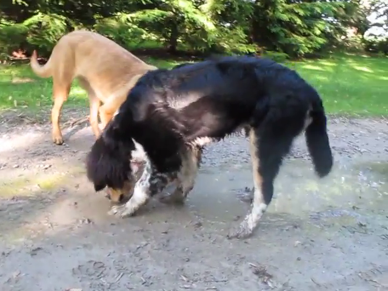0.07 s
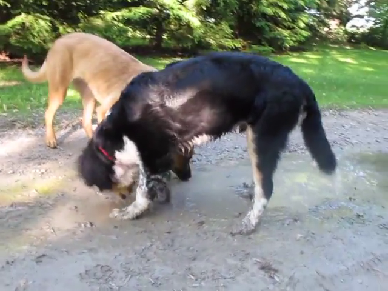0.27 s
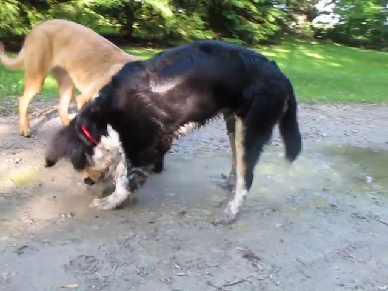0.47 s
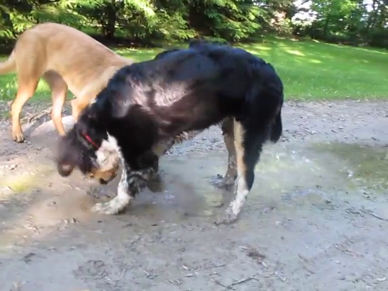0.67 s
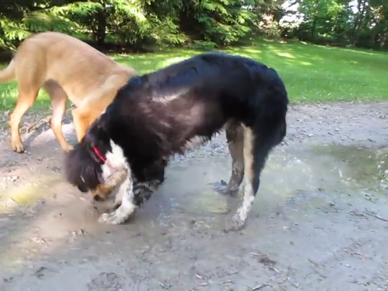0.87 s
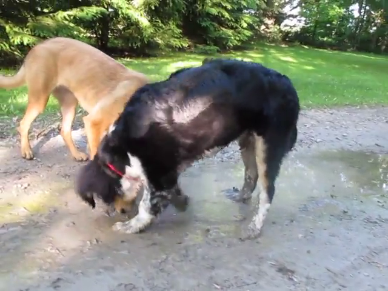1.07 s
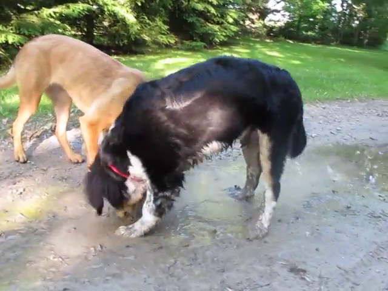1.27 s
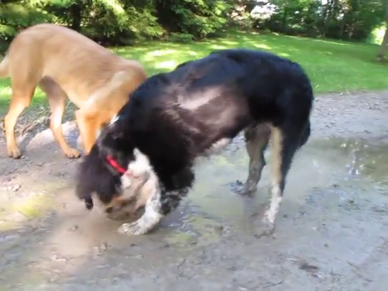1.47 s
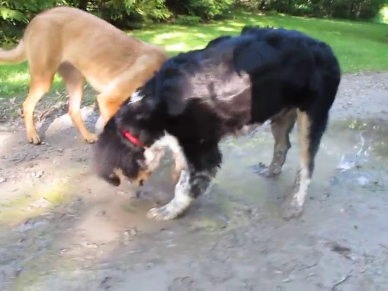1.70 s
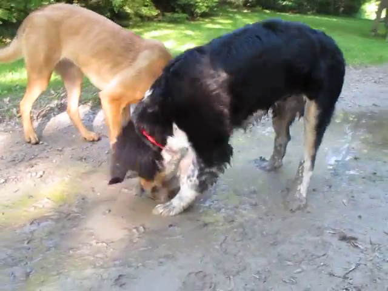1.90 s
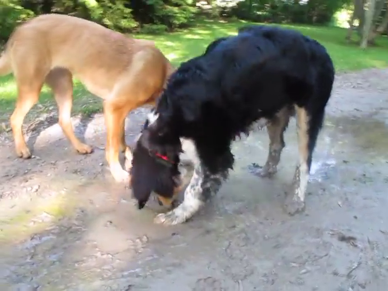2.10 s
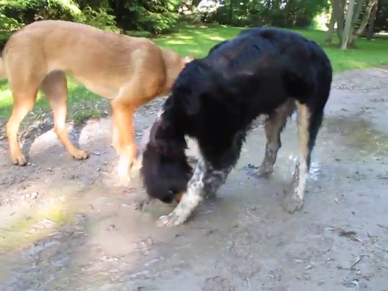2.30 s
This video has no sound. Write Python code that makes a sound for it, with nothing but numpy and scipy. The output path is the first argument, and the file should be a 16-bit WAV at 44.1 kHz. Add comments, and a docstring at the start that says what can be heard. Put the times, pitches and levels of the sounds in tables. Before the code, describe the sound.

A dog splashes in a shallow muddy puddle a couple of metres away. Quick paw strokes slosh and squelch from about 0.3 to 1 second, with bubbles, dull knocks and spray pattering down. A softer stroke comes near 1.3 seconds, then more splashes run from 1.5 to 2.2. Light wind rumbles under faintly hissing trees throughout, and a distant bird chirps very faintly around 2.3 seconds.

```python
"""Splashing, slapping and squelching: a dog digs in a shallow muddy puddle a couple of metres away.
Each paw stroke pushes water aside, churns up bubbles and throws a spray that patters back down.
Single drops smack, bubbles plink and the paws knock dully on the bottom of the puddle.
Light wind rumbles under a faint hiss of trees, and a far bird chirps near the end."""
import sys
import numpy as np
from scipy import signal
from scipy.io import wavfile

SR = 44100
rng = np.random.default_rng(int(sys.argv[2]) if len(sys.argv) > 2 else 0)


def unload_wav(signal):
    """Save mono or channel-first audio to the path in sys.argv[1] as 16-bit WAV at rate SR, clipped to [-1, 1]."""
    wavfile.write(
        sys.argv[1],
        SR,
        np.round(np.clip(np.atleast_2d(signal).T, -1, 1) * 32767).astype(np.int16),
    )


N = 108045
TIME = np.arange(N) / SR

# the tone of fine spray, flying up or falling back: (pitch [Hz], relative level [dB per Hz])
SPRAY_TONE = [(3500, -2.5), (7000, -4), (10000, 0), (11500, -12.5), (16000, -12)]


def from_db(db):
    """Turn decibels into a number to multiply a sound by."""
    return 10 ** (np.asarray(db) / 20)


def rms_one(x):
    """Scale a sound so that its average power is 1."""
    return x / np.sqrt(np.mean(x ** 2) + 1e-20)


def level_at(tone, hz):
    """Read the level at any pitch from a table of pitches and levels."""
    pitches, levels = np.array(tone).T
    return np.interp(np.log(hz), np.log(pitches), levels)


def add(out, start, sound):
    """Mix a sound in at a start time in seconds."""
    i = max(int(start * SR), 0)
    out[i:i + len(sound)] += sound[:max(N - i, 0)]


def band(x, low, high):
    """Keep the part of a sound between two pitches in Hz."""
    sos = signal.butter(2, [low, min(high, SR / 2 - 500)], "band", fs=SR, output="sos")
    return signal.sosfilt(sos, x + 1e-18)


def drift(rate_hz):
    """A smooth random wobble, about 1 in size."""
    step, warm_up = 40, 2000
    r = np.exp(-2 * np.pi * rate_hz * step / SR)
    jitter = rng.standard_normal(N // step + warm_up + 2)
    slow = signal.lfilter([1], [1, -2 * r, r * r], jitter)[warm_up:]
    return np.interp(np.arange(N) / step, np.arange(len(slow)), rms_one(slow))


def wavering_noise(tone, waver_db, bands):
    """Noise in bands of pitch, each growing louder and softer on its own."""
    edges, out = np.geomspace(tone[0][0], tone[-1][0], bands + 1), 0
    for low, high in zip(edges, edges[1:]):
        hiss = band(rng.standard_normal(N + SR), low, high)[SR:]
        db = level_at(tone, np.sqrt(low * high)) + waver_db * drift(11)
        out = out + hiss * from_db(db)
    return rms_one(out)


def droplets(gain, tone, per_s, cycles, spread_db, clump_db, pitches):
    """Bubbles and drops ring briefly at many pitches: a dense wash when loud, ticks when quiet."""
    crowd = np.clip(gain / np.max(gain), .03, 1) ** .7  # share of per_s that sounds
    sizes = from_db(spread_db * np.minimum(rng.exponential(1, N), 3))
    kicks = sizes * rng.choice([-1, 1], N) / np.sqrt(crowd)
    happens = rng.random(N) < crowd * per_s / SR
    clicks = kicks * happens * from_db(clump_db * np.clip(drift(87), -2, 2))
    which_pitch, out = rng.integers(0, pitches, N), 0
    low, high = tone[0][0], tone[-1][0]
    for k, hz in enumerate(np.geomspace(low, high, pitches)):
        r = np.exp(-np.log(1000) * hz / (cycles * SR))  # fades 60 dB over that many cycles
        feedback = [1, -2 * r * np.cos(2 * np.pi * hz / SR), r * r]
        ringing = signal.lfilter([1, 0, -1], feedback, clicks * (which_pitch == k) + 1e-18)
        out = out + rms_one(ringing) * np.sqrt(hz) * from_db(level_at(tone, hz))
    return gain * rms_one(band(out, low, high))


def splats(rows, width):
    """Tiny wet pockets collapse in a quick burst, pitched by their size, then fizz out."""
    out, t = np.zeros(N), TIME[:SR // 10] - .005
    click_ms = .34  # a splat this short spreads twice as wide in pitch as a long one
    for start, db, hz, ms in rows:
        half_width = width * (1 + click_ms / ms) / 2  # as a share of the centre pitch
        ratio = half_width + np.sqrt(1 + half_width ** 2)
        past_peak = t * 1000 / ms - .42  # in splat lengths
        burst = np.exp(-2 * past_peak ** 2)
        fizz = from_db(-15) * (past_peak > 0) * np.exp(-t / .008)
        crackle = band(rng.laplace(size=len(t)) * (burst + fizz), hz / ratio, hz * ratio)
        crackle *= np.sqrt(np.sum(burst ** 2) / np.sum(crackle ** 2))
        add(out, start + t[0], from_db(db) * crackle)
    return out


def rings(rows, rise_per_s):
    """Pure tones that die away, gaining rise_per_s times their starting pitch each second."""
    out, t = np.zeros(N), TIME[:SR // 10]
    for start, db, hz, fade_s in rows:
        envelope = (1 - np.exp(-t / .0008)) * np.exp(-np.log(1000) * t / fade_s)
        tone = np.sin(2 * np.pi * hz * (t + rise_per_s * t * t / 2))
        add(out, start, from_db(db) * envelope * tone)
    return out


def breeze():
    """Wind rumbles on the microphone and hisses in far trees."""
    # the tone of the rumble, then of the hiss: (pitch [Hz], relative level [dB per Hz])
    wind_tone = [(15, 5), (28, 3.5), (60, -6), (90, -8.5), (130, -10.5), (190, -26), (280, -28.5)]
    tree_tone = [(200, -1), (270, 5), (370, -2), (1000, -4.5), (2000, -8.5), (10000, -14.5), (13000, -11.5),
                 (16000, -29)]
    rumble = from_db(-40.5) * wavering_noise(wind_tone, waver_db=2, bands=7)
    hiss = from_db(-55.5) * wavering_noise(tree_tone, waver_db=2, bands=18)
    return rumble + hiss


def swell(time, rise, hold, fall):
    """Grow 20 dB per rise until time, hold, then drop 20 dB per fall; a negative fall cuts off."""
    before = np.maximum(time - TIME, 0) / max(rise, 1e-3)
    after = np.maximum(TIME - time - hold, 0) / max(fall, 1e-3)
    return from_db(-20 * (before + after))


def falling_drops():
    """The wet coat drips throughout; thrown water patters back, its larger drops ringing briefly."""
    # showers of falling water: (time [s], rise [s], hold [s], fall [s], level [dB])
    showers = [(0.635, 0.092, 0.15, -0.1, -43.5), (0.977, 0.074, 0.048, 0.21, -42),
               (1.662, 0.015, 0.02, 0.25, -47.5), (2.2, .02, 0.02, 0.18, -54)]
    # the tone of the larger drips: (pitch [Hz], relative level [dB per Hz])
    drip_tone = [(1300, -2), (3000, -6.5), (9000, -11)]
    shower = sum(from_db(db) * swell(*timing) for *timing, db in showers)
    coat, large_drops = from_db(-61), from_db(-9) * shower
    dripping = np.hypot(coat, large_drops)  # hypot adds the powers of two sounds
    patter = droplets(shower, SPRAY_TONE, per_s=1500, cycles=12, spread_db=2.2, clump_db=2, pitches=22)
    drips = droplets(dripping, drip_tone, per_s=450, cycles=18, spread_db=4, clump_db=2.5, pitches=24)
    return patter + drips


def mud_squelches():
    """Mud slaps and squelches as pockets in it collapse."""
    # squelches: (time [s], level [dB], centre pitch [Hz], length [ms])
    squelches = [(.013, -45, 2310, 4.2), (.2015, -37, 3130, 8.8), (.330, -39.5, 1410, 2),
                 (.384, -24.5, 1800, 5.3), (.410, -30.5, 2070, 3.7), (.4162, -21.5, 1280, 2.4),
                 (.501, -29.5, 710, 2.5), (.535, -28.5, 2830, 3.8), (.571, -37, 2140, 1.8),
                 (.8975, -28, 1480, 3.3), (.917, -29.5, 920, 4.7), (.9365, -29, 494, 2.5),
                 (.953, -23, 3020, 2.4), (.960, -24, 2820, 4.7), (1.199, -42.5, 2140, 2.1),
                 (1.338, -30.5, 2270, 11), (1.385, -30, 2530, 1.44), (1.4402, -32.5, 2330, 0.77),
                 (1.564, -24, 2260, 5.6), (1.5835, -20.5, 3200, 2.6), (1.747, -33.5, 2770, 2.9),
                 (1.831, -33, 3400, 6.8), (1.880, -35, 1000, 2.8), (1.9228, -23, 1620, 4.1),
                 (1.946, -20.5, 1910, 2.6), (1.964, -30, 2800, 8.9), (2.0265, -20, 1520, 0.63),
                 (2.030, -21.5, 1600, 0.72), (2.083, -29.5, 2220, 0.86), (2.1087, -25.5, 1800, 0.77)]
    return splats(squelches, width=.94)


def bubble_plinks():
    """Single bubbles ring, gliding up in pitch as they near the surface."""
    # bubbles: (time [s], level [dB], starting pitch [Hz], time to fade 60 dB [s])
    plinks = [(.204, -18, 5700, 0.0068), (.231, -28, 4000, 0.011), (.6065, -17.5, 1426, 0.026),
              (.7925, -26.5, 760, 0.029), (1.474, -28, 2800, 0.014), (1.5635, -11, 2900, 0.01),
              (1.828, -23, 2460, 0.018)]
    return rings(plinks, rise_per_s=8)


def drop_smacks():
    """Drops land and thin films of water burst with a bright smack."""
    # smacks: (time [s], level [dB], centre pitch [Hz], length [ms])
    smacks = [(.2625, -36, 7340, 0.7), (.3095, -39, 6940, 1.5), (.357, -30.5, 7300, 4.7),
              (.3965, -24, 6900, 6.9), (.4022, -26, 8260, 3.2), (.5005, -27, 7300, 6.1),
              (.6235, -29.5, 6530, 2.4), (.6648, -30, 9100, 1), (.7175, -28.5, 8500, 4.2),
              (.7918, -19, 9000, 2.7), (.883, -27.5, 7200, 1.5), (.9355, -25.5, 6500, 4.3),
              (1.2795, -34, 6200, 3), (1.291, -34, 7400, 6.7), (1.5305, -33.5, 6500, 5.4),
              (1.560, -32, 6690, 6.6), (1.5835, -34, 6700, 2.1), (1.693, -27.5, 9800, 1.6),
              (1.7475, -30, 7060, 4.2), (1.7745, -26, 8900, 1.8), (1.7925, -25, 8700, 4.1),
              (1.835, -33, 9800, 4), (1.9038, -22.5, 8500, 2.5), (1.9145, -18, 7800, 0.95),
              (2.0438, -24.5, 7850, 1), (2.152, -31.5, 7040, 2.5), (2.1615, -29.5, 7550, 4),
              (2.331, -40.5, 8560, 2.3)]
    return splats(smacks, width=.54)


def paw_strokes():
    """Each stroke makes a slosh pitched by its depth, bubbles and spray, and leaves the water lapping."""
    # strokes: (time of full force [s], rise [s], hold [s], fall [s],
    #           slosh pitch [Hz], slosh level [dB], bubble level [dB], spray level [dB])
    strokes = [(0.366, 0.024, 0.042, 0.0233, 680, -36, -34.5, -36.5),
               (0.498, 0.1, 0.027, -0.06, 640, -38.5, -38.5, -41.5),
               (0.533, 0.053, 0.045, 0.07, 1070, -41.5, -31, -32.5),
               (0.791, 0.012, 0.011, 0.07, 766, -42, -38.5, -34.5),
               (0.918, 0.046, 0.027, 0.1153, 416, -38.5, -34, -37.5),
               (1.273, 0.076, 0.09, 0.1, 1250, -43, -50, -51),
               (1.493, 0.036, 0.028, 0.19, 650, -43, -36, -42),
               (1.582, 0.02, 0.018, 0.0161, 630, -56, -34.5, -34),
               (1.759, 0.025, 0.019, 0.1, 755, -47, -39.5, -35.5),
               (1.917, 0.026, 0.04, 0.0045, 1250, -34, -29.5, -29.5),
               (1.966, 0.027, 0.029, 0.11, 900, -40.5, -36, -37.5),
               (2.157, 0.043, 0.035, 0.04, 865, -50.5, -45, -44)]
    # the tone of a slosh: (pitch [times the slosh pitch], relative level [dB per Hz])
    slosh_tone = [(0.249, -8.5), (1, -4.5), (1.7, -9)]
    # the tone of churned bubbles: (pitch [Hz], relative level [dB per Hz])
    churn_tone = [(700, -7), (1100, -4.5), (1600, 0), (3200, 2.5), (4200, -5), (5500, -60)]
    slosh, churn, thrown = np.zeros((3, N))
    for time, rise, hold, fall, slosh_hz, slosh_db, churn_db, spray_db in strokes:
        push = swell(time, rise, hold, fall)
        lapping = from_db(-27) * swell(time, rise, hold, fall=.4)
        tone = [(slosh_hz * multiple, db) for multiple, db in slosh_tone]
        slosh += droplets(from_db(slosh_db) * push, tone,
                          per_s=3000, cycles=3.9, spread_db=2, clump_db=1, pitches=8)
        churn = np.hypot(churn, from_db(churn_db) * np.hypot(push, lapping))
        lingering = swell(time, rise, hold, fall * 1.33)  # spray outlasts the push
        thrown = np.hypot(thrown, from_db(spray_db) * lingering)
    bubbles = droplets(churn, churn_tone, per_s=9000, cycles=24, spread_db=3.2, clump_db=1.9, pitches=26)
    spray = droplets(thrown, SPRAY_TONE, per_s=13000, cycles=33, spread_db=2, clump_db=2, pitches=22)
    return slosh + bubbles + spray


def paw_thumps():
    """The paw pads hit the bottom of the puddle with a dull knock."""
    # knocks: (time [s], level [dB], pitch [Hz], time to fade 60 dB [s])
    thumps = [(.416, -27, 300, 0.0063), (.9735, -20, 117, 0.019), (1.094, -32.5, 134, 0.023),
              (1.565, -22, 326, 0.018), (1.922, -28, 130, .03)]
    return rings(thumps, rise_per_s=0)


def far_bird():
    """A small bird far off whistles thin notes that slide up and down."""
    # chirps: (time [s], length [s], starting pitch [Hz], ending pitch [Hz])
    chirps = [(2.266, 0.056, 5000, 6300), (2.3, 0.057, 5100, 3280), (2.386, 0.042, 4900, 8300),
              (2.416, 0.039, 5500, 3640)]
    out = np.zeros(N)
    for start, length, start_hz, end_hz in chirps:
        hz = np.geomspace(start_hz, end_hz, int(length * SR))
        whistle = np.sin(2 * np.pi * np.cumsum(hz) / SR)
        add(out, start, from_db(-62) * np.sqrt(np.hanning(len(hz))) * whistle)
    return out


def with_echo(x):
    """Grass and trees scatter back a faint, dull echo."""
    t, fade_s = TIME[:SR // 2], .19
    envelope = (1 - np.exp(-t / .0099)) * np.exp(-np.log(1000) * t / fade_s)
    scatter = band(rng.standard_normal(len(t)), 180, 9600) * envelope
    scatter /= np.sqrt(np.sum(scatter ** 2))
    return x + from_db(-27.5) * signal.fftconvolve(x, scatter)[:N]


def scene():
    """The dog digs through mud and water in the open air."""
    mud = mud_squelches() + drop_smacks() + paw_thumps()
    water = paw_strokes() + falling_drops() + bubble_plinks()
    return (with_echo(mud + water) + breeze() + far_bird())[None]


def record(dry):
    """The microphone dulls the highest treble, and the very top is cut off."""
    dulled = signal.sosfilt(signal.butter(3, 12500, fs=SR, output="sos"), dry)
    return signal.sosfilt(signal.cheby2(14, 70, 17000, fs=SR, output="sos"), dulled)


dry = scene()
out = record(dry)
unload_wav(out)
```